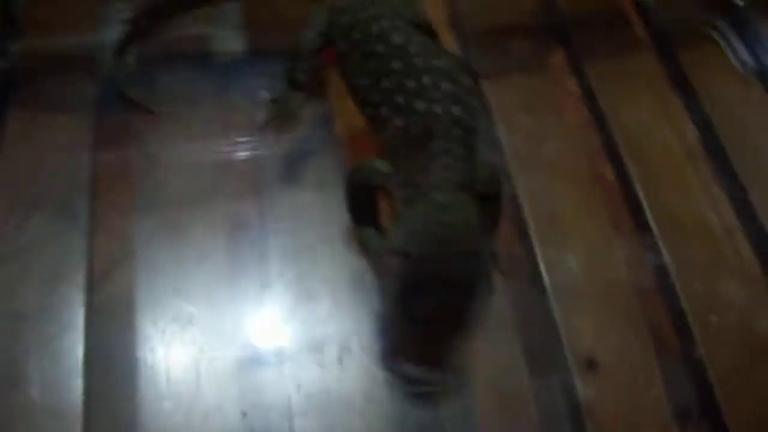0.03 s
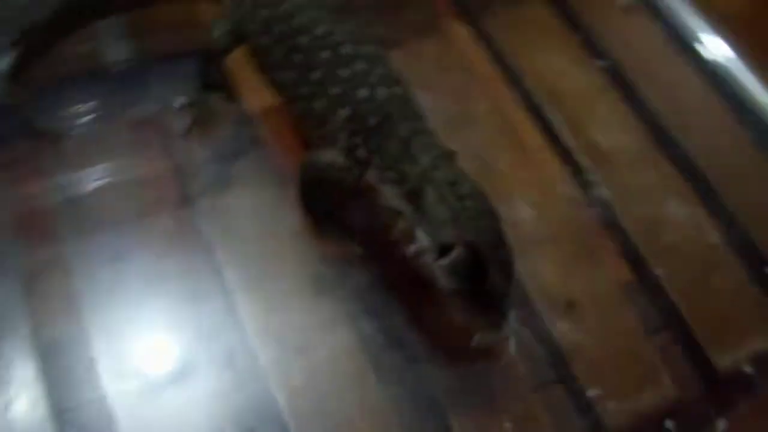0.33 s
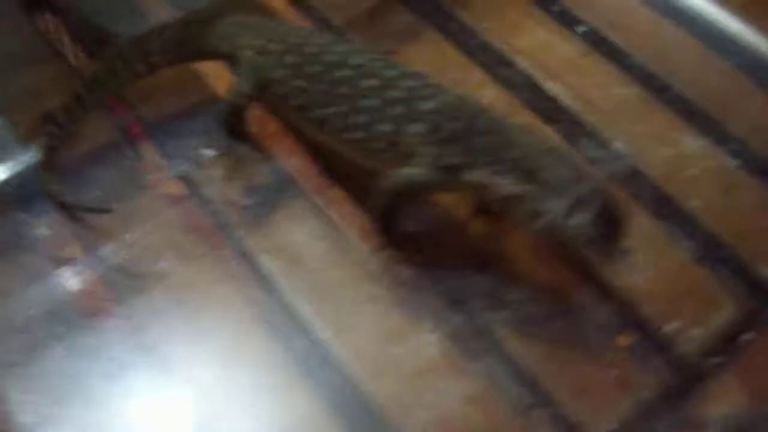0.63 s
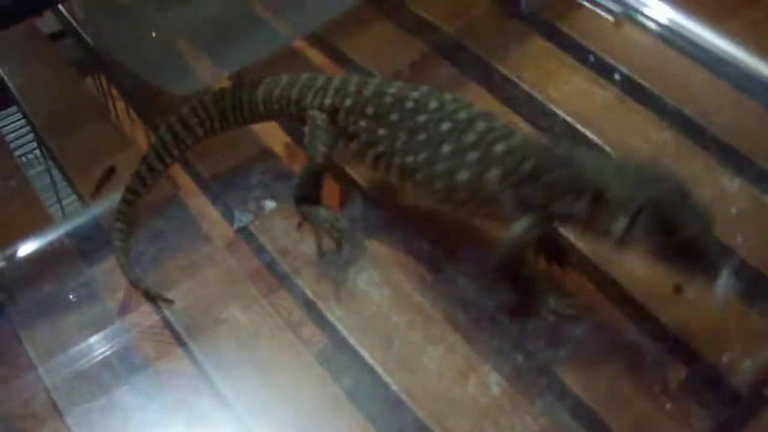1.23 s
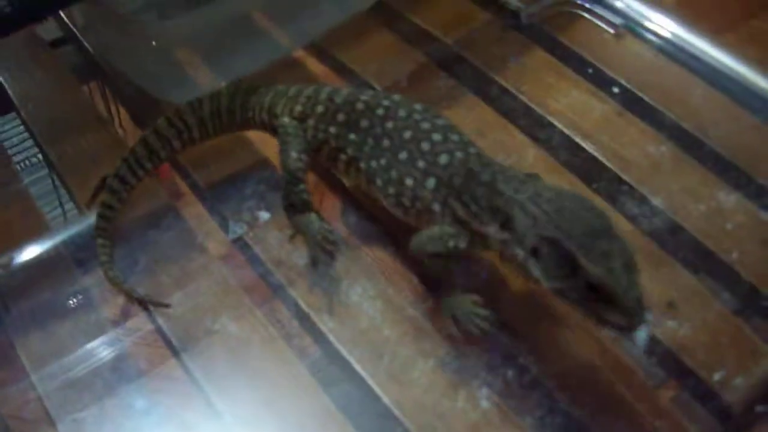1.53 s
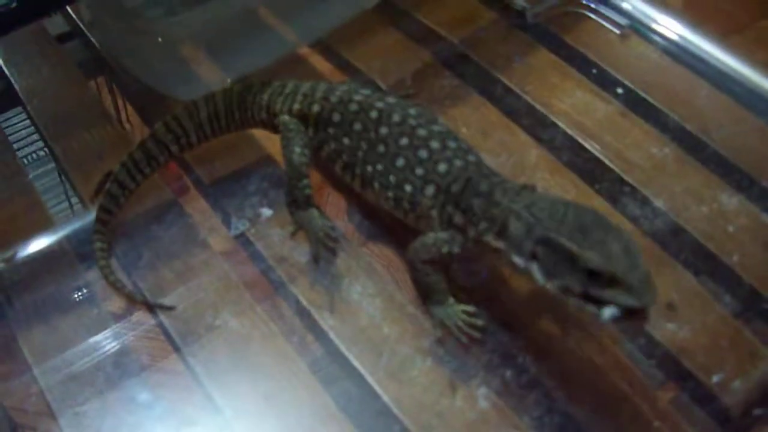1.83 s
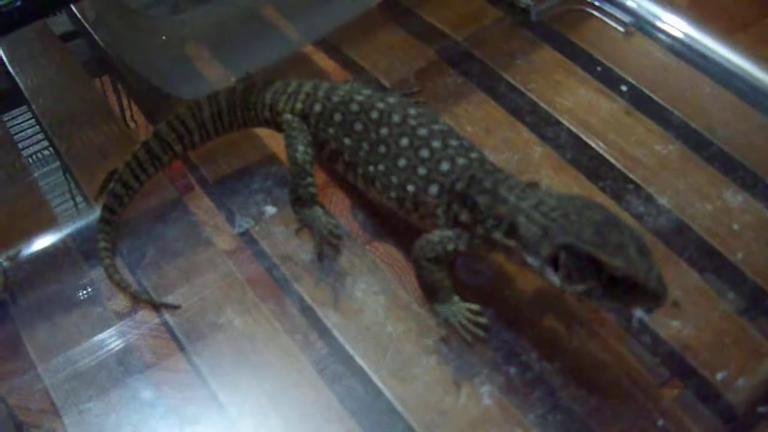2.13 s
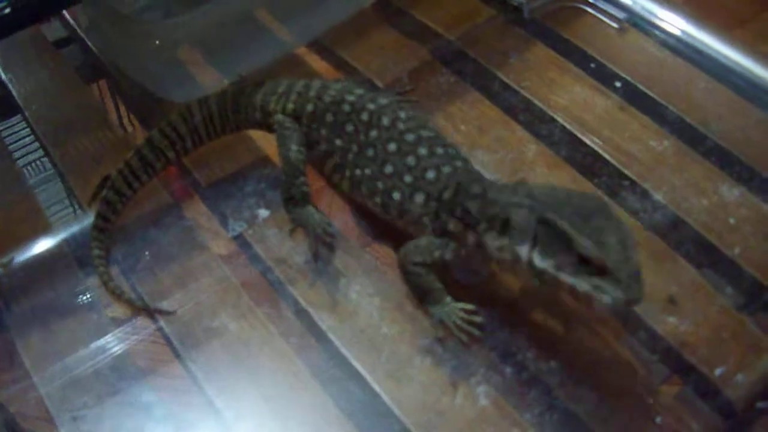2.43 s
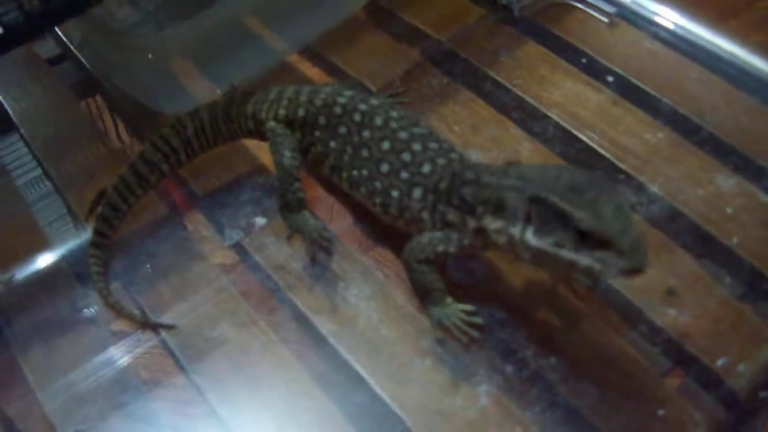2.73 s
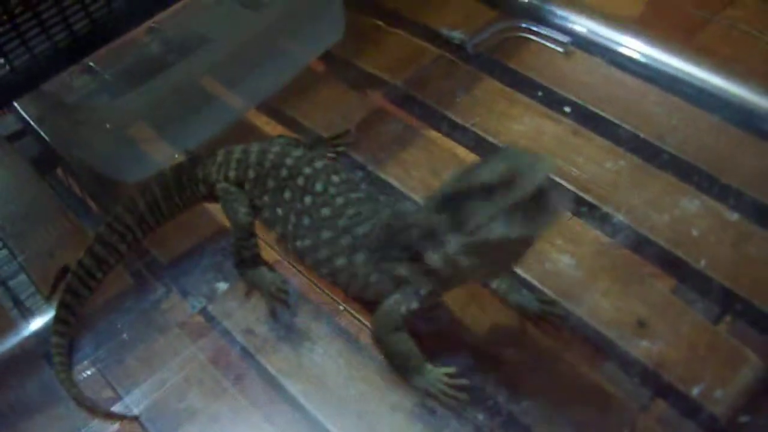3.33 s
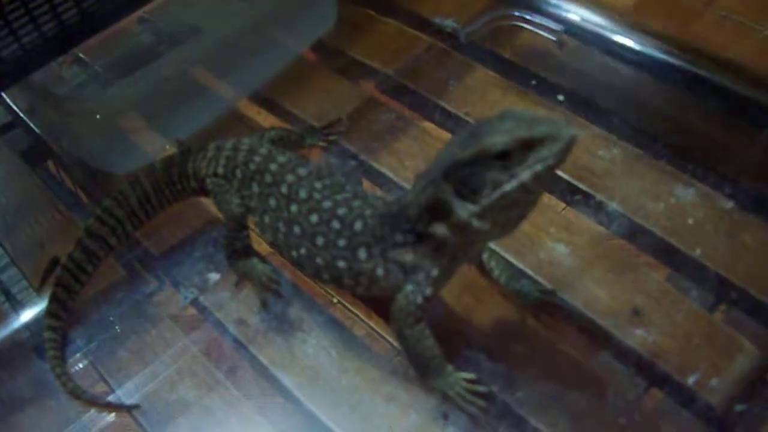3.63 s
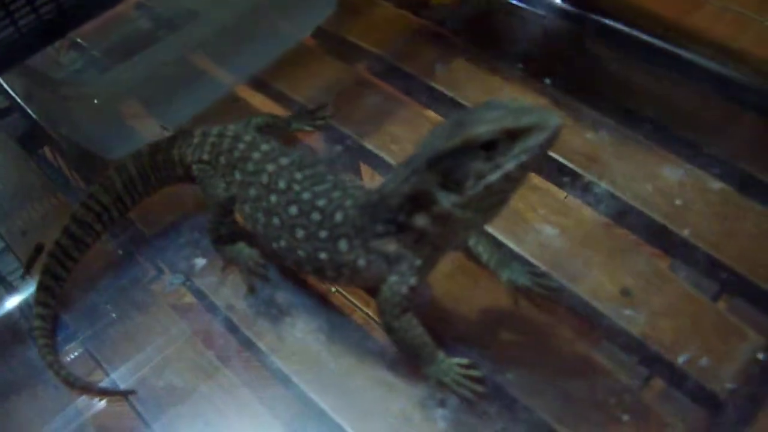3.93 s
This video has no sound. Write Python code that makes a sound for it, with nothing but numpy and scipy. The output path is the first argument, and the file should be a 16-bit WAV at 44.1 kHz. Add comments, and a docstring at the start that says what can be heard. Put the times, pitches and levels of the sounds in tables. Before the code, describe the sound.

A steady rush of ventilation fills a room, with dull finger knocks close on the microphone and faint lizard claw scratches on plastic. The knocks grow heavier, with brief scraping, and after the heaviest the rush turns quieter.

```python
"""A small lizard walks about a plastic tub, followed by a hand-held camera. From the start, ventilation
rushes under a thin hiss and the hand rumbles on the camera body. Around 1 s claws scratch faintly on
the plastic, and the fingers knock the camera in short runs of dull bumps. Heavier bumps, with rubbing
and scraping, come near 2.2 s. After the heaviest, near 3 s, the whole background drops and stays low."""
import sys
import numpy as np
from scipy import signal
from scipy.fft import rfft, irfft
from scipy.io import wavfile

SR = 44100
rng = np.random.default_rng(int(sys.argv[2]) if len(sys.argv) > 2 else 0)


def wrap_up_sound(samples):
    """Save the sound to the file named by the first command line argument, as 16-bit audio."""
    columns = np.atleast_2d(samples).T
    # keep every value between -1 and 1, then stretch to whole-number steps
    tamed = np.clip(columns, -1, 1)
    steps = np.round(tamed * 32767).astype(np.int16)
    wavfile.write(sys.argv[1], SR, steps)


N = 176400
TIME = np.arange(N) / SR

# Spectrum of friction on the camera casing. Each row: frequency in Hz, relative density in dB.
CASING_SPECTRUM = [(200, 5.5), (600, 13), (2000, -0.5), (4200, 9.5), (7000, 8), (8200, -1), (8600, -17),
                   (9000, -26.5)]


def from_db(db):
    """Amplitude ratio: a factor of ten for every 20 dB."""
    return 10 ** (np.asarray(db) / 20)


def rms_one(x):
    """Normalisation to unit mean power."""
    return x / np.sqrt(np.mean(x ** 2) + 1e-20)


def gain_curve(rows):
    """Gain over time, linear in decibels between (seconds, dB) points."""
    return from_db(np.interp(TIME, *np.transpose(rows)))


def coloured(x, spectrum):
    """Spectral shaping by (Hz, dB) points, falling 60 dB per octave past the ends; unit power."""
    hz, db = np.transpose(spectrum)
    octave = np.log2(np.fft.rfftfreq(N, 1 / SR) + 1)
    knots = np.log2(hz)
    octaves_beyond = np.abs(octave - np.clip(octave, knots.min(), knots.max()))
    response = from_db(np.interp(octave, knots, db) - 60 * octaves_beyond)
    return rms_one(irfft(rfft(x) * response, N))


def resonate(x, hz, width_hz):
    """A damped two-pole resonator with unit gain at its peak."""
    radius = np.exp(-np.pi * width_hz / SR)
    numerator = np.array([1, 0, -1]) * (1 - radius ** 2) / 2
    denominator = [1, -2 * radius * np.cos(2 * np.pi * hz / SR), radius ** 2]
    return signal.lfilter(numerator, denominator, x + 1e-18)


def narrow_noise(hz, width_hz):
    """Steady-state response of two like resonators in series to white noise; unit power."""
    once = resonate(rng.standard_normal(N + SR), hz, width_hz)
    return rms_one(resonate(once, hz, width_hz)[SR:])


def swell(peak_s, attack_s, decay_s):
    """Exponential growth to 1 at peak_s, then exponential decay."""
    age = TIME - peak_s
    return np.exp(-np.maximum(age / decay_s, -age / attack_s))


def finger_knocks():
    """Impact excitation: the heavily damped camera body swings once as its casing judders and creaks."""
    # A harder contact thuds higher. Each row: centre time in seconds, level in dB, frequency in Hz.
    knocks = [(0.029, -9.5, 18.5), (0.216, -10, 91), (.905, -22, 59), (0.974, -15.5, 28), (1.04, -25, 53),
              (1.365, -12.5, 23), (1.492, -11.5, 116), (1.513, -9, 63), (2.175, -5, 194), (2.194, -5, 68),
              (2.223, -14.5, 90), (2.288, -15, 220), (2.307, -7.5, 69), (2.367, -16, 56), (2.477, -15, 120),
              (2.517, -13, 55), (2.552, -12, 52), (2.929, -5.5, 49), (2.948, -3, 57), (2.97, -15, 110),
              (3.016, -9.5, 91), (3.042, -9, 257), (3.047, -7.5, 73), (3.123, -16.5, 90), (3.325, -14, 17)]
    # Each row: frequency in Hz, relative density in dB.
    judder_spectrum = [(80, -5), (150, 6.5), (260, -13), (450, -12), (800, -25.5)]
    thud_width_cycles = 0.59
    thuds, judder_envelope, creak_envelope = np.zeros((3, N))
    for centre_s, db, hz in knocks:
        cycles = (TIME - centre_s) * hz
        thuds -= from_db(db) * np.sin(2 * np.pi * cycles) / (1 + (cycles / thud_width_cycles) ** 2) ** 2
        judder_envelope += from_db(db) * swell(centre_s, attack_s=0.0063, decay_s=0.012)
        creak_envelope += from_db(db) * swell(centre_s, attack_s=0.005, decay_s=0.006)
    judder = from_db(-18.5) * judder_envelope * coloured(rng.standard_normal(N), judder_spectrum)
    creak = from_db(-42.5) * creak_envelope * coloured(rng.standard_normal(N), CASING_SPECTRUM)
    return thuds + judder + creak


def hand_grip():
    """Structure-borne sound: the shifting grip rumbles, and skin friction rubs in tiny random grains."""
    # Each row: frequency in Hz, relative density in dB.
    rumble_spectrum = [(8, -15), (18, 5), (35, -1.5), (60, -6), (100, -15), (160, -24.5), (300, -31.5),
                       (700, -63)]
    # Each row of both: time in seconds, level in dB.
    rumble_levels = [(0, -17), (.08, -25.5), (.7, -27.5), (2.05, -25), (2.2, -15.5), (2.52, -21.5),
                     (2.7, -28), (2.9, -18.5), (3.1, -26), (3.33, -32.5), (3.41, -35), (4, -35.5)]
    rub_levels = [(0, -52), (.08, -72), (2.1, -71), (2.3, -55), (2.65, -73), (2.9, -68), (3.1, -65),
                  (3.34, -67), (3.39, -81), (4, -81)]
    grains_per_s, grain_decay_s = 500, 0.002
    rumble = coloured(rng.standard_normal(N), rumble_spectrum)
    impulses = (rng.random(N) < grains_per_s / SR) * rng.uniform(0.37, 1, N)
    grain_envelope = signal.lfilter([1], [1, -np.exp(-1 / (grain_decay_s * SR))], impulses + 1e-18)
    rub = coloured(grain_envelope * rng.standard_normal(N), CASING_SPECTRUM)
    return gain_curve(rumble_levels) * rumble + gain_curve(rub_levels) * rub


def finger_slips():
    """Sliding friction: fingers slip on the casing in short, dry, bell-shaped bursts of noise."""
    # Each row: centre time in seconds, level in dB, length in seconds.
    slips = [(1.512, -56, .025), (2.187, -47.5, .03), (2.94, -46, .03), (3.055, -55, .025),
             (3.113, -60, .02), (3.325, -59, .02)]
    envelope = sum(from_db(db) * np.exp(-(2 * (TIME - centre_s) / length_s) ** 2)
                   for centre_s, db, length_s in slips)
    return envelope * coloured(rng.standard_normal(N), CASING_SPECTRUM)


def lizard_claws():
    """Friction of claws on the plastic floor: each scratch is a brief swell of band-limited noise."""
    # Each row: peak time in seconds, level in dB, centre in Hz, width in Hz, decay in seconds.
    scratches = [(.752, -45.5, 6660, 350, 0.038), (1.025, -50, 2930, 600, 0.026),
                 (1.028, -52, 5100, 1100, 0.032), (1.065, -50, 6300, 305, .025),
                 (2.355, -38.5, 1940, 600, 0.029), (2.91, -31.5, 950, 500, .02)]
    attack_s = 0.0087
    return sum(from_db(db) * swell(peak_s, attack_s, decay_s) * narrow_noise(hz, width_hz)
               for peak_s, db, hz, width_hz, decay_s in scratches)


def ventilation():
    """Broadband flow noise with narrow duct resonances and a thin hiss; the level drops near 3 s."""
    # Each row of both: frequency in Hz, relative density in dB.
    air_spectrum = [(100, -8), (130, -1.5), (175, -5), (250, -2), (345, -2.5), (435, -8.5), (560, -10),
                    (685, -8), (760, -7), (900, -8.5), (1100, -11), (1250, -13.5), (1600, -15.5),
                    (2050, -17.5), (2600, -23.5), (3000, -28.5), (3400, -32), (3850, -39), (4200, -52)]
    hiss_spectrum = [(4200, -18.5), (4500, -12), (5000, -6), (6000, -1), (6600, 0), (7500, -3),
                     (8100, -10.5), (8600, -20.5), (9000, -43)]
    # Each row: frequency in Hz, width in Hz, level in dB.
    duct_resonances = [(243.6, 11.3, -43), (298.7, 13, -43), (344.6, 13, -44.5), (745, 43, -46.5),
                       (770, 32, -49)]
    # Each row: time in seconds, change of level in dB.
    level_changes = [(0, 0), (2.17, 0), (2.205, -4), (2.31, 0), (2.92, -0.5), (2.96, -5.5), (3.035, -3),
                     (3.055, -11.5), (3.2, -8.5), (3.65, -10.5), (3.83, -8), (4, -10)]
    duct_share = 0.68   # the resonances follow this share of the change in dB
    air = from_db(-29) * coloured(rng.standard_normal(N), air_spectrum)
    ducts = sum(from_db(db) * narrow_noise(hz, width_hz) for hz, width_hz, db in duct_resonances)
    hiss = from_db(-50) * coloured(rng.standard_normal(N), hiss_spectrum)
    gain = gain_curve(level_changes)
    return gain * (air + hiss) + gain ** duct_share * ducts


def scene():
    """Superposition: all sources add at one microphone."""
    return (ventilation() + hand_grip() + finger_knocks() + finger_slips() + lizard_claws())[None]


def record(dry):
    """Band limiting: a steep elliptic low-pass filter removes the highest treble."""
    cutoff_hz = 8900
    return signal.sosfilt(signal.ellip(12, .1, 90, cutoff_hz, fs=SR, output="sos"), dry)


dry = scene()
out = record(dry)
wrap_up_sound(out)
```